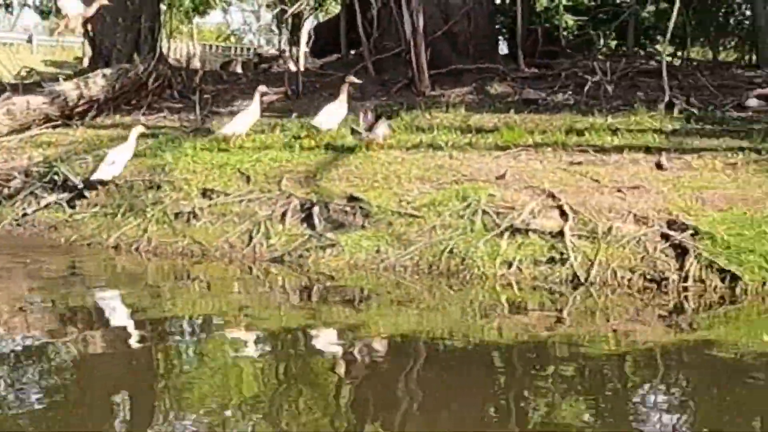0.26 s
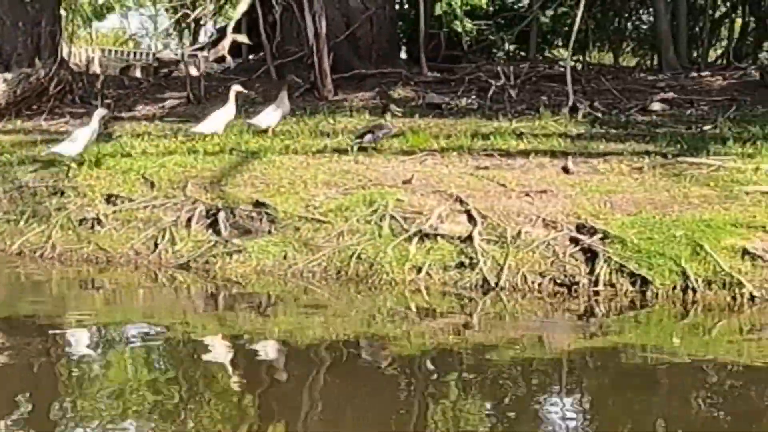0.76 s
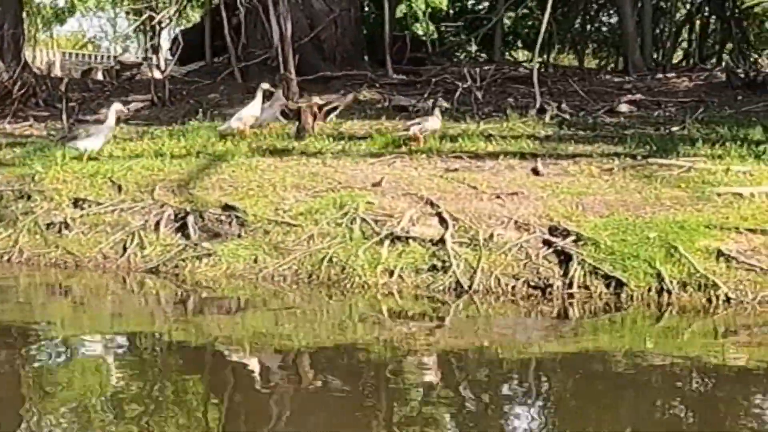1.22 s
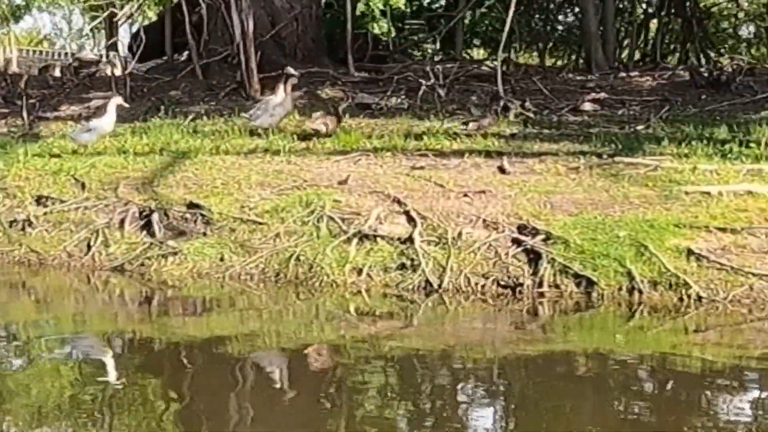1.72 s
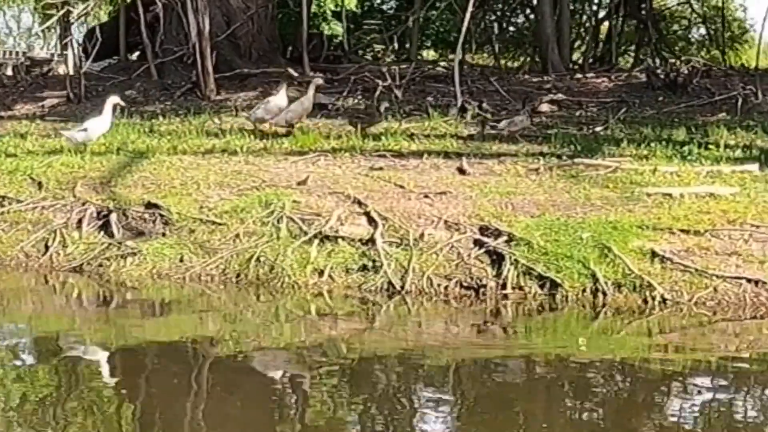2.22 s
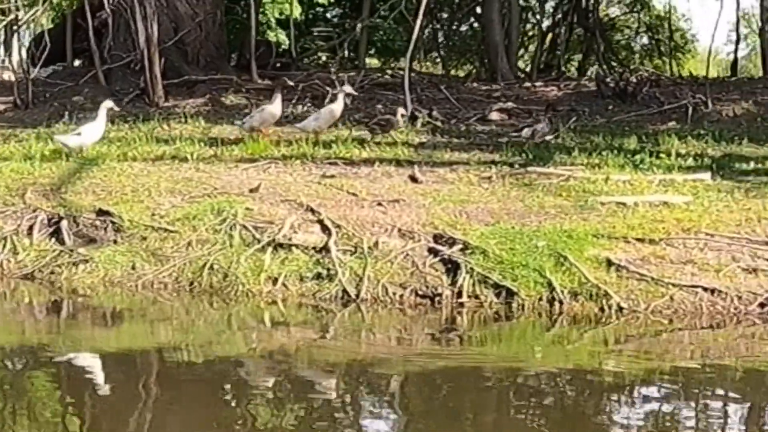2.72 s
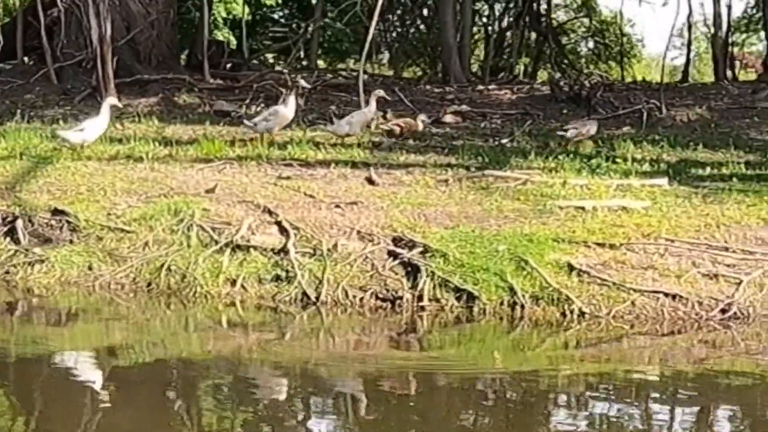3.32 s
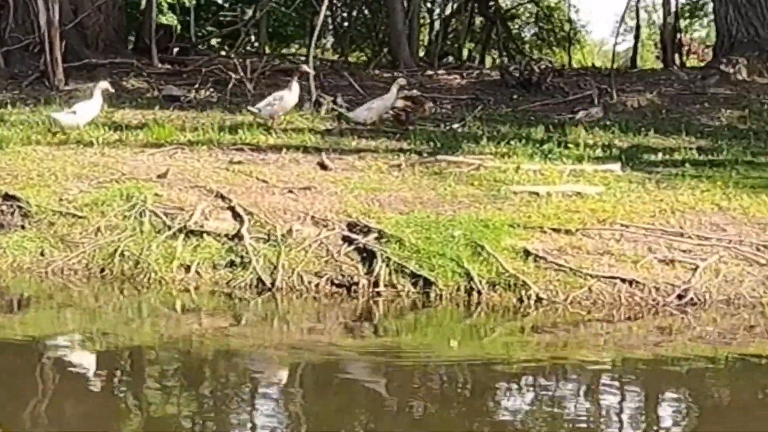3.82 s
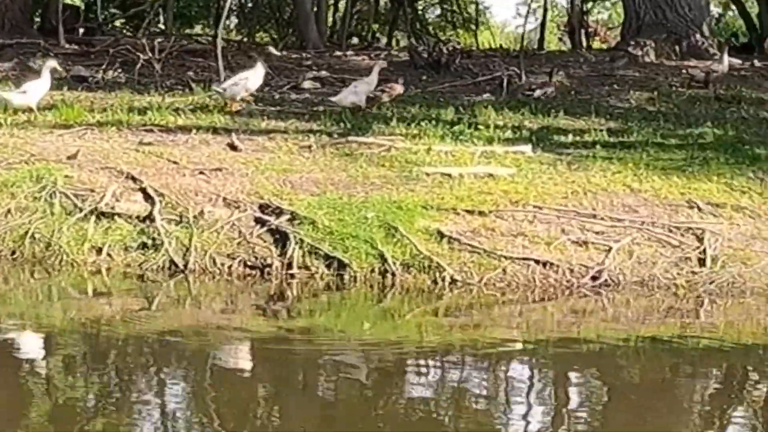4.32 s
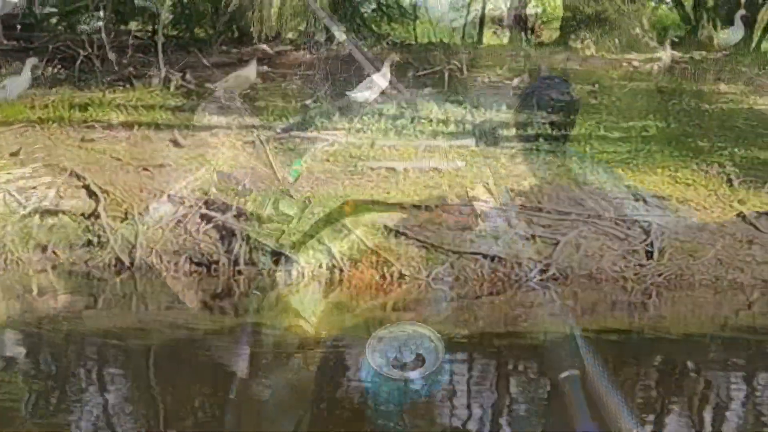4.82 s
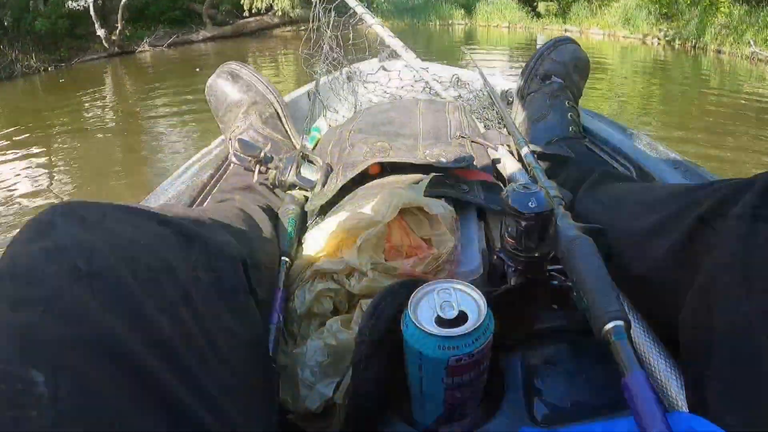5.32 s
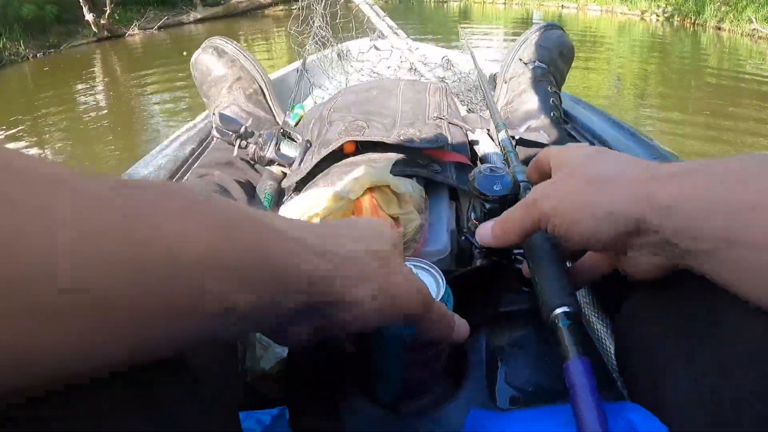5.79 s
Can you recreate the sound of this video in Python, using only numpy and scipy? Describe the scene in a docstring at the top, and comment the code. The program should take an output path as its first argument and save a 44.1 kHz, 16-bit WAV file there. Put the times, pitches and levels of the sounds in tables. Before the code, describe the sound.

Wind rumbles throughout on a stereo microphone in a small boat on a pond, with a soft hiss of leaves and a low, wavering hum underneath. On the bank, drakes give six hoarse rasps, each about a quarter second long, at the very start and around 0.7, 1.6, 2.5, 3.4 and 4.4 seconds. Short breathy grunts fall between them until about 5 seconds, and a hen duck clucks low from 0.5 to 3.4 seconds. Farther back, songbirds whistle and trill faintly with a little echo from the trees. Gear ticks lightly close by, more sharply near 4.4 and 5.7 seconds. From about 4.6 seconds someone shifts in the boat: dull rubbing and soft knocks begin, then cloth swishes three times between 5.2 and 5.8 seconds. Deep hull thumps land near 5.2 and, loudest, 5.6 seconds, as the wind grows slightly toward the end at 6 seconds.

```python
"""A drake rasps on a pond bank over wind rumble on the microphone, heard in stereo from a small boat.
Drakes go on rasping and grunting and a hen duck clucks low: pulses from the syrinx ring in the throat.
Farther back, songbirds whistle and trill in the trees; leaves hiss and a low hum lies underneath.
Gear ticks aboard. Near the end someone shifts in the boat: cloth rustles and the hull thumps."""
import sys
import numpy as np
from scipy import signal
from scipy.fft import rfft, irfft
from scipy.io import wavfile
from scipy.ndimage import uniform_filter1d, map_coordinates

SR = 44100
rng = np.random.default_rng(int(sys.argv[2]) if len(sys.argv) > 2 else 0)


def inscribe(sig):
    """Save sig as 16-bit PCM at rate SR to the path in sys.argv[1].

    A 1-D sig is mono; a 2-D sig holds one channel per row.
    Samples are clipped to [-1, 1] before scaling.
    """
    pcm = np.round(np.clip(np.atleast_2d(sig).T, -1, 1) * 32767)
    wavfile.write(sys.argv[1], SR, pcm.astype(np.int16))


N = 266995
TIME, FREQ = np.arange(N) / SR, np.fft.rfftfreq(N, 1 / SR)

# likeness of left and right at the microphone pair: (frequency [Hz], correlation [0-1])
MIC_LIKENESS = [(40, .93), (300, .94), (1000, .75), (3000, .55), (7000, .65), (13000, .42)]
# sound from the bank at the pair: (frequency [Hz], phase lead of the left side [rad])
BANK_PHASE = [(20, -0.34), (1000, -.3), (1900, -0.55), (2900, -1.24), (4000, -0.85), (7000, 0.12)]
# echo from the trees: (frequency [Hz], time to fall 60 dB [s])
TREE_DECAY = [(300, 0.38), (2000, 0.4), (4000, 0.46), (9000, 0.21)]
# wind rumble on the microphone: (frequency [Hz], relative level [dB])
WIND_SPECTRUM = [(15, -27), (28, -8), (42, 1.5), (60, -7.5), (85, -11.5), (120, -3), (160, -12),
                 (210, -14.5), (280, -19), (420, -32.5), (800, -73)]
# strength of that wind: (time [s], relative level [dB])
GUSTS = [(0.0, -40.5), (1.16, -39.5), (1.62, -41.5), (1.95, -43), (3.25, -42.5), (4.08, -44), (5.26, -40),
         (5.41, -38), (6.05, -36)]
# swell of the hiss in grass and leaves: (time [s], relative level [dB])
BREEZE = [(0.0, -70.5), (0.32, -71), (0.67, -76), (0.96, -74), (1.56, -77.5), (1.84, -76.5), (2.19, -79),
          (2.92, -75), (3.31, -75.5), (3.69, -77.5), (4.08, -77), (4.6, -74.5), (5.0, -77)]
# broad hiss of the open air, and rustle of dry leaves: (frequency [Hz], relative level [dB])
AIR_SPECTRUM = [(150, -1.5), (300, -3), (500, -1), (1100, -0.5), (2200, -1), (3300, -9.5), (6100, -15.5),
                (7500, -21), (8300, -27.5), (10400, -26.5), (12400, -36), (14500, -68)]
LEAF_SPECTRUM = [(1500, -25), (3000, -0.5), (5000, 0), (7500, -4.5), (10500, -9), (12800, -14),
                 (14500, -35)]
# distant whistles: (time [s], length [s], start pitch [Hz], settled pitch [Hz], relative level [dB])
WHISTLES = [(0.253, 0.36, 2600, 2360, -52), (.355, .08, 2120, 2005, -52), (0.781, 0.13, 4670, 4496, -51),
            (.8, 0.051, 4450, 3470, -47.5), (1.45, 0.023, 3590, 5120, -46.5),
            (1.508, 0.13, 3050, 2900, -48.5), (2.303, 0.045, 3100, 2883, -48),
            (2.322, 0.087, 2896, 2470, -47), (2.77, 0.076, 2970, 3050, -48), (3.315, 0.17, 2310, 2690, -48),
            (3.337, .13, 1570, 1685, -53.5)]
# distant buzzy trills: (time [s], length [s], pitch [Hz], warble depth [Hz], relative level [dB])
TRILLS = [(.87, 0.061, 3740, 220, -43), (0.998, 0.064, 3590, 130, -51.5), (1.498, .06, 4330, 300, -50.5),
          (1.835, .17, 4270, 109, -48.5), (2.76, 0.074, 4190, 200, -51.5), (2.896, 0.05, 6300, 150, -60),
          (3.003, .1, 5080, 115, -63), (3.767, 0.068, 7180, 170, -58), (3.83, 0.24, 3036, 170, -51),
          (4.35, .12, 3635, 99, -49.5), (4.737, 0.09, 3970, 60, -52.5)]
# dull rubbing and bright cloth hiss in the boat: (frequency [Hz], relative level [dB])
RUB_SPECTRUM = [(80, -39), (140, -16), (195, -1), (300, -11), (410, -12), (600, -21), (1050, -20),
                (2000, -26.5), (4000, -35), (8000, -55.5)]
CLOTH_SPECTRUM = [(1470, -41), (2500, -9), (3230, -7), (3770, -10), (4540, -1), (6030, -2), (7510, -6),
                  (9000, -12), (12000, -18), (13600, -30)]
# strokes of cloth on cloth: (peak time [s], level [dB])
CLOTH_STROKES = [(5.24, -53.5), (5.59, -49.5), (5.78, -44.5)]
# soft knocks and laps of water on the hull: (time [s], level [dB], frequency [Hz])
THUMPS = [(2.065, -35.5, 161), (3.545, -50, 687), (4.626, -36.5, 191), (4.68, -30.5, 114),
          (4.692, -44, 595), (4.72, -37.5, 198), (4.934, -32, 198), (5.048, -37.5, 303), (5.233, -22, 72.4),
          (5.538, -22, 56), (5.568, -17, 64.6)]
# gear ticking close by: (time [s], level [dB], centre [Hz], time to fall 60 dB [s])
GEAR_TICKS = [(.343, -48.5, 5960, .02), (.434, -45.5, 5540, .03), (.719, -49, 5760, .1),
              (2.724, -54.5, 6860, 0.055), (2.905, -49, 6300, .017), (2.993, -48.5, 6000, .017),
              (3.824, -47, 6900, .009), (4.362, -35.5, 5200, 0.014), (5.668, -27.5, 6140, 0.011),
              (5.925, -34, 3970, 0.012), (5.98, -47.5, 8240, .02), (6.004, -47, 5470, 0.03)]
# throat resonances, before the bill shifts them: (frequency [Hz], width [Hz], relative level [dB])
DRAKE_THROAT = [(1770, 260, -5), (2150, 330, 0), (2780, 380, -8.5), (4600, 600, -32), (5450, 700, -28),
                (6700, 1200, -39)]
HEN_THROAT = [(605, 220, -2.5), (1067, 420, 0), (1423, 190, -3), (2040, 540, -12), (4080, 530, -21)]
# short hen clucks and drake grunts on the bank: (time [s], length [s], relative level [dB])
CLUCKS = [(.498, 0.034, -41), (.679, 0.03, -43), (1.055, 0.047, -41.5), (1.372, .062, -41),
          (2.594, 0.032, -47), (2.75, 0.0397, -42.5), (3.022, 0.04, -43), (3.375, 0.066, -45.5)]
GRUNTS = [(.0, 0.024, -47.5), (.63, .045, -52), (1.305, 0.057, -51), (1.534, 0.072, -47.5),
          (2.178, 0.053, -49.5), (2.407, 0.075, -44), (3.006, 0.057, -46.5), (3.221, 0.076, -44.5),
          (3.724, 0.0662, -48), (3.943, 0.073, -43.5), (4.172, .082, -44), (4.806, 0.052, -55),
          (5.035, 0.046, -54)]
# long drake rasps: (time [s], length [s], relative level [dB], bill opening [factor], tilt [dB/octave])
RASPS = [(.0, .21, -40.5, 1.063, 8), (.74, .29, -37, 0.99, 6), (1.589, 0.3, -35, 0.99, 2.5),
         (2.545, .27, -35, 1.008, 0), (3.434, .3, -35, 1.01, 2.5), (4.351, .29, -37, 1.012, -0.5)]


def amp(db):
    """Decibels to gain."""
    return 10 ** (np.asarray(db) / 20)


def unit(x):
    """Scales to rms 1."""
    return x / np.sqrt(np.mean(abs(x) ** 2) + 1e-20)


def along(points, hz):
    """Reads a table on a log-frequency axis."""
    f, value = np.transpose(points)
    return np.interp(np.log(hz + 1), np.log(f + 1), value)


def level(curve):
    """Gain at every sample from rows of (time [s], level [dB])."""
    return amp(np.interp(TIME, *np.transpose(curve)))


def add(mix, s, sound):
    """Mixes a sound in at time s."""
    part = mix[max(round(s * SR), 0):][:len(sound)]
    part += sound[:len(part)]


def wander(size, hz):
    """Smooth random motion of rms about 1, through hz random values a second."""
    knots = rng.standard_normal(4000)
    return map_coordinates(knots, [np.arange(size) * hz / SR], order=3, mode="wrap")


def noise(spectrum, patchy_db, frames, bins):
    """Diffuse noise at the microphone pair; its level varies in patches of frames by bins."""
    hz = np.fft.rfftfreq(2048, 1 / SR)
    a, b, c, d, patches = rng.standard_normal((5, N // 512 + 5, len(hz)))
    patches = unit(uniform_filter1d(uniform_filter1d(patches, frames, axis=0), bins, axis=1))
    likeness = along(MIC_LIKENESS, hz)
    left = a + 1j * b
    right = likeness * left + np.sqrt(1 - likeness ** 2) * (c + 1j * d)
    bands = np.array([left, right]) * amp(along(spectrum, hz) + patchy_db * patches)
    return unit(signal.istft(bands.swapaxes(1, 2), nperseg=2048, noverlap=1536)[1][:, :N])


def from_bank(x, left_db):
    """Places a sound on the bank: mostly a little earlier on the right, and louder on the left."""
    turn = amp(left_db / 2) * np.exp(.5j * along(BANK_PHASE, FREQ))
    return irfft(rfft(x) * np.array([turn, 1 / turn]), N)


def tree_echo(x, build_up_s, likeness):
    """Trunks and leaves scatter sparse echoes that build up and then die band by band."""
    taps = rng.standard_normal((3, SR)) * (rng.random((3, SR)) < 2000 / SR)
    hz, t, bands = signal.stft(taps[:2] + 2 * likeness * taps[2], SR, nperseg=256)
    decay = amp(-60 * t / along(TREE_DECAY, hz)[:, None])
    onset = 1 - np.exp(-(t / build_up_s) ** 2)
    tail = signal.istft(bands * decay * onset, SR, nperseg=256)[1]
    tail /= np.linalg.norm(tail, axis=1, keepdims=True)
    return signal.fftconvolve(x, tail, axes=1)[:, :N]


def hum(hz=81.56, db=-43):
    """A low tone under everything, wavering in pitch and level."""
    phase = 2 * np.pi * np.cumsum(hz + .95 * wander(N, 8)) / SR
    return np.sqrt(2) * np.sin([phase - .25, phase]) * amp(db + 1.95 * wander(N, 27))


def mic_wind():
    """Wind buffets the microphone with a deep rumble."""
    return level(GUSTS) * amp(.5) * noise(WIND_SPECTRUM, patchy_db=1.3, frames=3, bins=2)


def breeze():
    """Around the pond the air hisses in the grass and dry leaves flutter."""
    air = amp(21.5 + .81 * wander(N, 14)) * noise(AIR_SPECTRUM, patchy_db=2.46, frames=3, bins=9)
    flutter = unit(amp(6 * wander(N, 22.03) + 5 * wander(N, 600)))
    leaves = amp(3.5) * flutter * noise(LEAF_SPECTRUM, patchy_db=2, frames=2, bins=40)
    return level(BREEZE) * (air + leaves)


def bird_note(length, start_hz, settled_hz, warble_hz, attack_s, slur_s=.0229):
    """One near-sine note that rises, trembles and fades while its pitch settles and warbles."""
    t = np.arange(int(length * SR)) / SR
    glide = settled_hz + (start_hz - settled_hz) * np.exp(-t / slur_s)
    hz = glide + warble_hz * wander(len(t), 520)
    tremble = amp(2.5 * wander(len(t), 42.4))
    envelope = np.minimum(t / attack_s, 1) * (1 - (t / length) ** 2)
    return envelope * tremble * np.sin(2 * np.pi * np.cumsum(hz) / SR)


def songbirds():
    """Gliding whistles and buzzy trills from deep in the trees, with more echo than direct sound."""
    song = np.zeros(N)
    for s, length, start_hz, settled_hz, db in WHISTLES:
        add(song, s, amp(db) * bird_note(length, start_hz, settled_hz, warble_hz=26.1, attack_s=.012))
    for s, length, hz, warble_hz, db in TRILLS:
        add(song, s, amp(db) * bird_note(length, hz, hz, warble_hz, attack_s=.031))
    direct = from_bank(song, left_db=1.7)
    return amp(-1.3) * direct + amp(2.2) * tree_echo(direct, build_up_s=.025, likeness=.85)


def rubbing(start_s=4.5, shift_s=5.11):
    """Dull rubbing fades in beside the microphone, then grows as someone shifts their weight."""
    fade_in = np.clip((TIME - start_s) / .31, 0, 1)
    shift = np.clip((TIME - shift_s) / .049, 0, 1)
    return fade_in * amp(-46 + 6 * shift) * noise(RUB_SPECTRUM, patchy_db=2.5, frames=3, bins=5)


def cloth(rise_db_per_s=135.5, fall_db_per_s=86):
    """Close by, cloth slides on cloth in strokes of grainy hiss."""
    strokes = sum(amp(db - np.maximum(rise_db_per_s * (s - TIME), fall_db_per_s * (TIME - s)))
                  for s, db in CLOTH_STROKES)
    grain = unit(amp(2.9 * wander(N, 380)))
    return strokes * grain * noise(CLOTH_SPECTRUM, patchy_db=2, frames=2, bins=55)


def hull_thumps(rise_s=.0074):
    """Each knock or lap of water rings the hull briefly at one low pitch."""
    t, out = np.arange(SR // 4) / SR, np.zeros(N)
    envelope = t / rise_s * np.exp(1 - t / rise_s)
    for s, db, hz in THUMPS:
        add(out, s, amp(db) * envelope * np.sin(2 * np.pi * hz * t))
    return out


def resonate(x, hz, width_hz):
    """A two-pole resonance applied twice, for steep skirts."""
    b, a = signal.iirpeak(hz, hz / (width_hz * np.pi / 2), SR)
    return signal.lfilter(b, a, signal.lfilter(b, a, x))


def gear_ticks(faint_count=9):
    """Gear clicks in the boat, close and dry: a few sharp ticks and faint ones at random."""
    t, out = np.arange(SR // 4) / SR, np.zeros((2, N))
    faint = [(N / SR * when, -61.5 + 10 * size, 6500, .022)
             for when, size in rng.random((faint_count, 2))]
    for s, db, hz, t60 in GEAR_TICKS + faint:
        envelope = np.minimum(t / .00099, 1) * amp(-60 * t / t60)
        shared, *own = rng.standard_normal((3, len(t)))
        for channel, scatter in zip(out, own):
            ring = unit(resonate(shared + .51 * scatter, hz, width_hz=1970))
            add(channel, s, amp(db) * envelope * ring)
    return out


def syrinx(rate_hz, rough, puff_s, jitter):
    """Each opening of the membranes gives a sharp pulse inside a short puff of turbulent air."""
    size = len(rate_hz)
    cycles = .5 + np.cumsum(rate_hz * (1 + jitter * wander(size, 150))) / SR
    pulses = np.diff(np.floor(cycles), prepend=0) * amp(wander(size, 209))
    from_pulse_s = ((cycles + .5) % 1 - .5) / rate_hz
    puffs = (.12 + np.exp(-(from_pulse_s / puff_s) ** 2)) * rng.standard_normal(N)[:size]
    puffs = signal.lfilter([1, -.9], [1], puffs)  # turbulence takes over in the upper resonances
    return np.sqrt(1 - rough) * unit(pulses) + np.sqrt(rough) * unit(puffs)


def throat(drive, modes, opening, tilt_db):
    """Steep resonances that rise as the bill opens and shift a little from pulse to pulse."""
    out = np.zeros(len(drive), complex)
    lag_s = np.arange(-SR // 100, SR // 100) / SR
    for hz, width_hz, db in modes:
        centre_hz = hz * opening * (1 + .03 * wander(len(drive), 120))
        carrier = np.exp(2j * np.pi * np.cumsum(centre_hz) / SR)
        ring = np.exp(-np.pi * (width_hz * lag_s) ** 2)
        band = carrier * signal.fftconvolve(drive / carrier, ring / ring.sum(), "same")
        octaves = np.log2(min(hz / modes[1][0], 1.4))  # the tilt pivots on the second resonance
        out += amp(db + tilt_db * octaves) * band
    # the swing of the membranes is limited, so the pulses come out blunt and alike in size
    swing = abs(unit(out)) / 1.9 + 1e-9
    return unit(out.real * np.tanh(swing) / swing)


def short_calls(calls, modes, rate_hz, sag, bill, bill_per_db, closing, rough, puff_s, tilt_db):
    """A handful of pulses that slow down under one arch of effort; louder calls open the bill wider."""
    out = np.zeros(N)
    for s, length, db in calls:
        progress = np.linspace(0, 1, int(length * SR))
        arch = abs(np.sin(np.pi * progress)) ** .97
        widest = bill + bill_per_db * (db + 42.5)
        opening = widest * (1 - closing * (1 - arch))
        drive = syrinx(rate_hz * (1 + sag * (.5 - progress)), rough, puff_s, jitter=.02)
        add(out, s, amp(db) * arch * throat(drive, modes, opening, tilt_db))
    return out


def hen_clucks():
    """The hen clucks: quick, fairly clean pulses through low throat resonances."""
    return short_calls(CLUCKS, HEN_THROAT, rate_hz=156.8, sag=.4, bill=1.009, bill_per_db=.07,
                       closing=.095, rough=.2, puff_s=.0014, tilt_db=0)


def drake_grunts():
    """Drakes grunt: a few slow, breathy pulses with the treble held down."""
    return short_calls(GRUNTS, DRAKE_THROAT, rate_hz=83.6, sag=.22, bill=.99, bill_per_db=.0139,
                       closing=.03, rough=.8, puff_s=.003, tilt_db=-9)


def drake_rasps(full_rate_hz=110.95, swell_share=.55, attack_s=.016, release_s=.03, slack_db=-9):
    """Long hoarse calls swell, hold and let go; pulse rate and bill follow the effort."""
    out = np.zeros(N)
    for s, length, db, bill, tilt_db in RASPS:
        progress = np.linspace(0, 1, int(length * SR))
        swell = np.sin(np.pi / 2 * np.minimum(progress / swell_share, 1))
        effort = swell * np.minimum(.307 + (1 - progress) * length / release_s, 1)
        gape = .034 * np.exp(-((progress - .855) / .1) ** 2)  # the bill opens wider near the end
        opening = bill * (.95 + .04 * effort + gape)
        drive = syrinx(full_rate_hz * (.68 + .32 * effort), rough=.8, puff_s=.0025, jitter=.035)
        voice = throat(drive, DRAKE_THROAT, opening, tilt_db)
        edges = np.minimum(progress * length / attack_s, 1) * signal.windows.tukey(len(progress), .06)
        add(out, s, amp(db + slack_db * (1 - swell ** 2)) * edges * voice)
    return out


def ducks():
    """Drakes and hen on the bank, mostly direct sound, with a faint echo from the trees behind."""
    calls = amp(5.5) * drake_grunts() + amp(1.94) * hen_clucks() + amp(-2.5) * drake_rasps()
    direct = from_bank(calls, left_db=.7)
    return direct + amp(-11) * tree_echo(direct, build_up_s=.0024, likeness=.97)


def scene():
    """The bank, the open air and the boat itself, as they reach the microphone pair aboard."""
    bank = ducks() + songbirds()
    background = mic_wind() + breeze() + hum()
    aboard = rubbing() + cloth() + hull_thumps() + gear_ticks()
    return background + aboard + bank


def record(dry):
    """The recorder cuts the treble steeply at 14.6 kHz."""
    lowpass = signal.firwin(301, 14600, window=("kaiser", 9), fs=SR)
    return signal.oaconvolve(dry, lowpass[None], "same")


dry = scene()
out = record(dry)
inscribe(out)
```